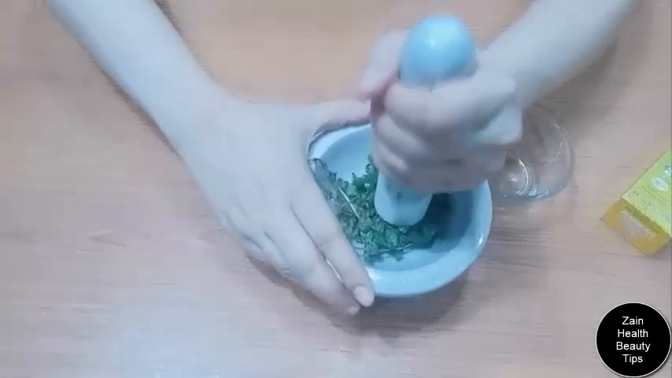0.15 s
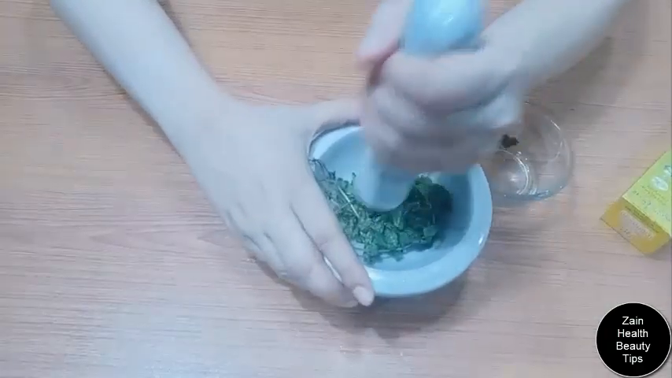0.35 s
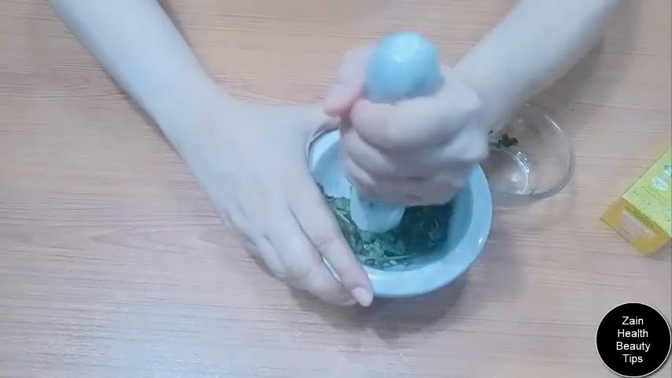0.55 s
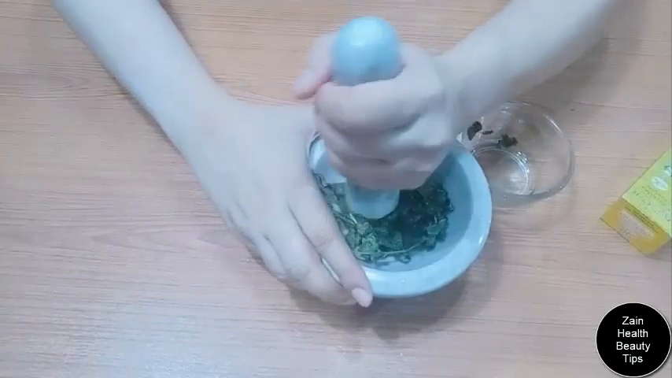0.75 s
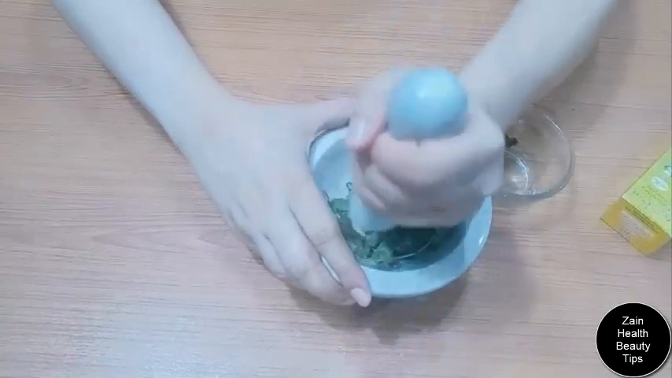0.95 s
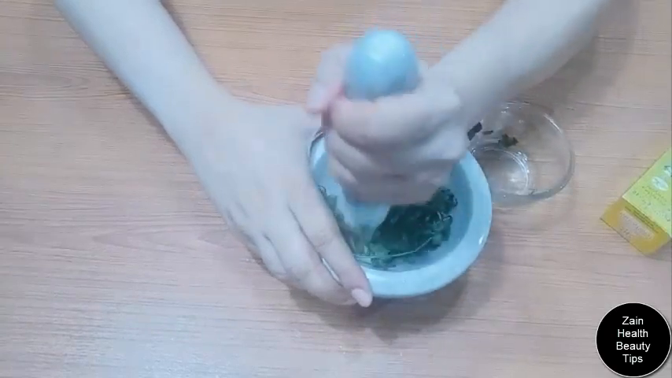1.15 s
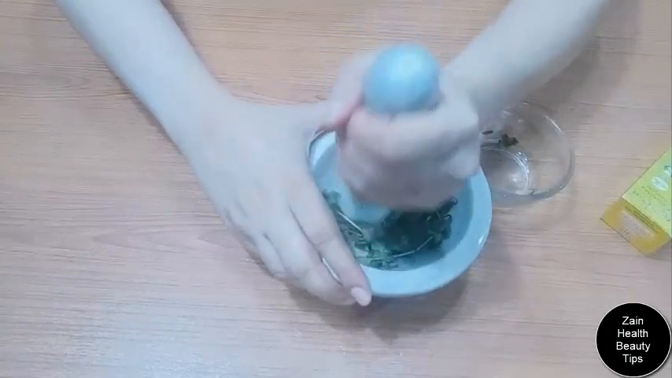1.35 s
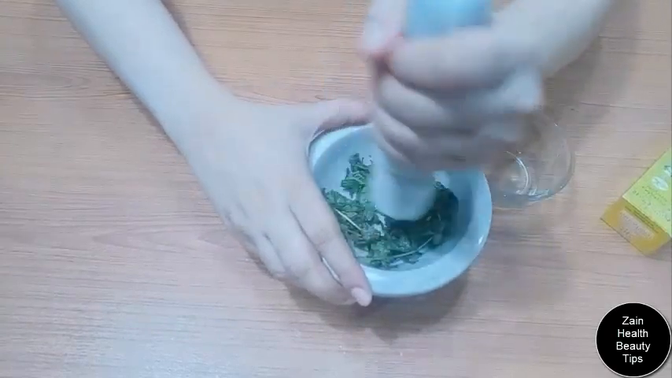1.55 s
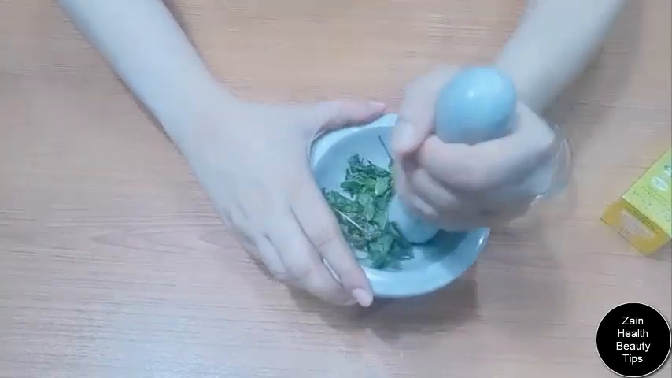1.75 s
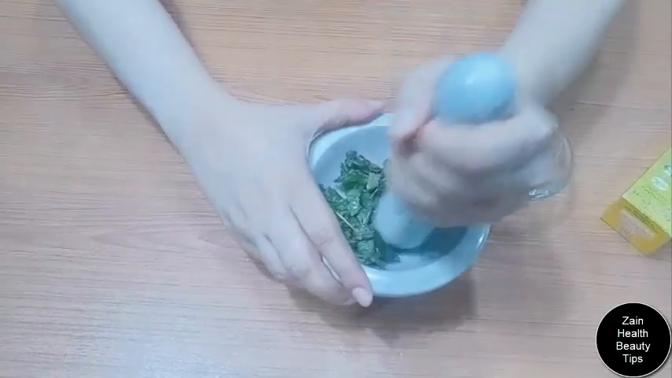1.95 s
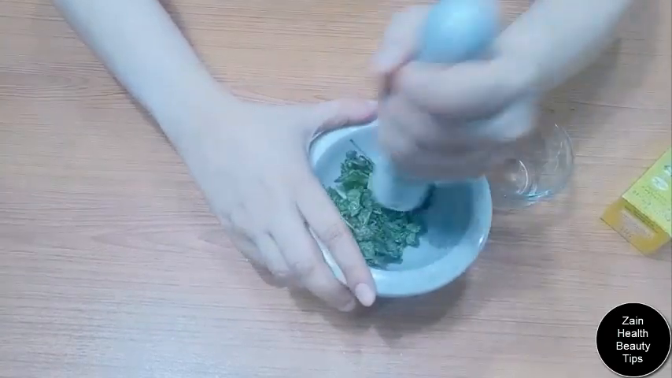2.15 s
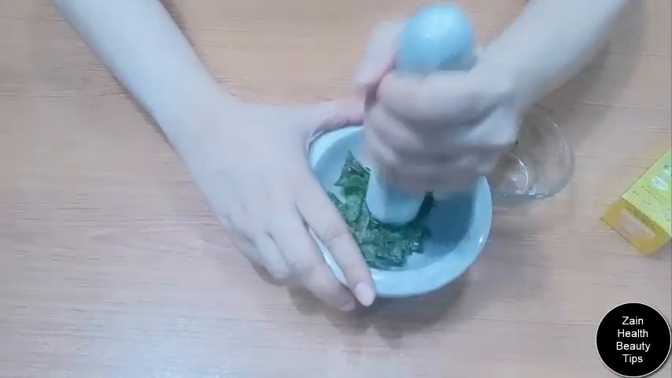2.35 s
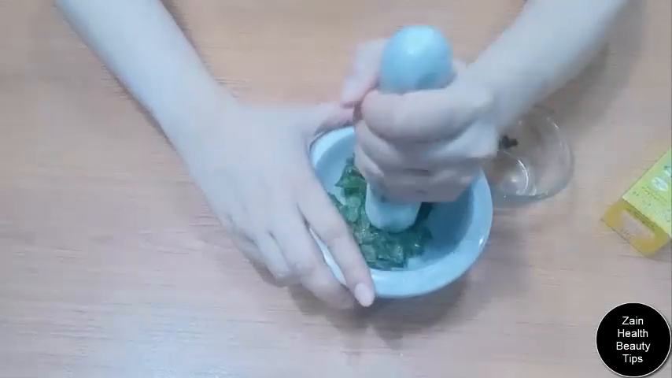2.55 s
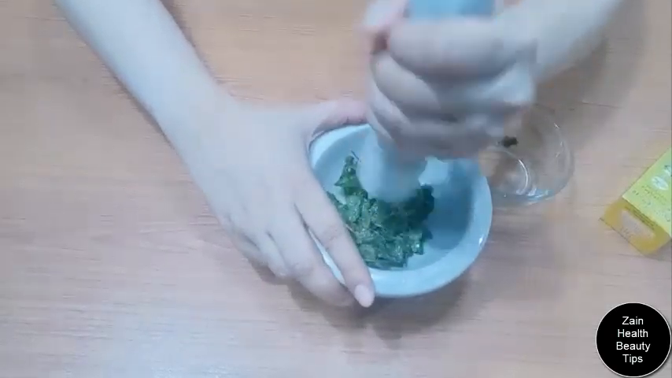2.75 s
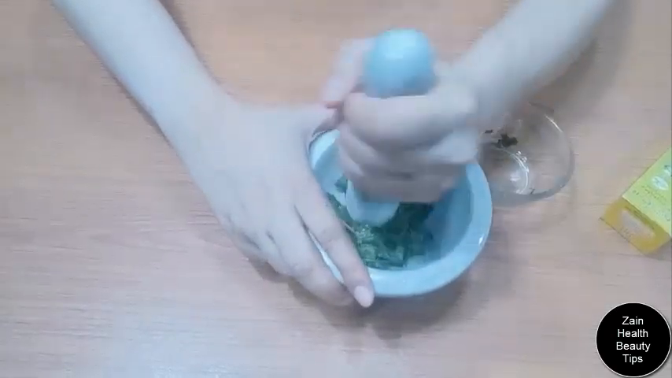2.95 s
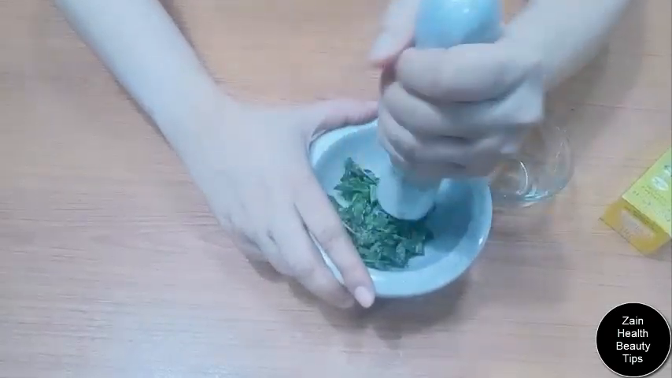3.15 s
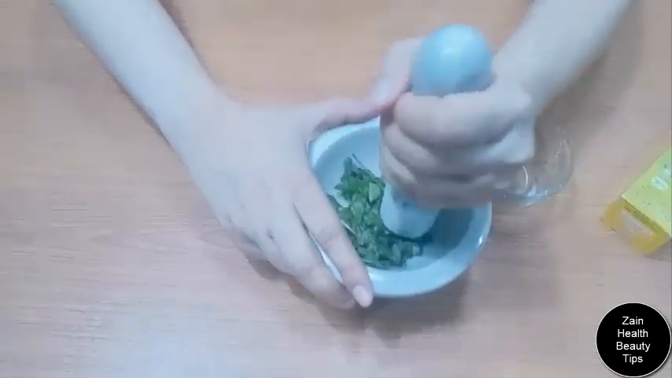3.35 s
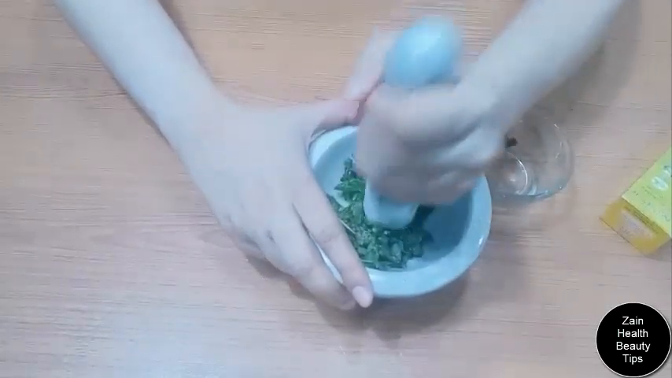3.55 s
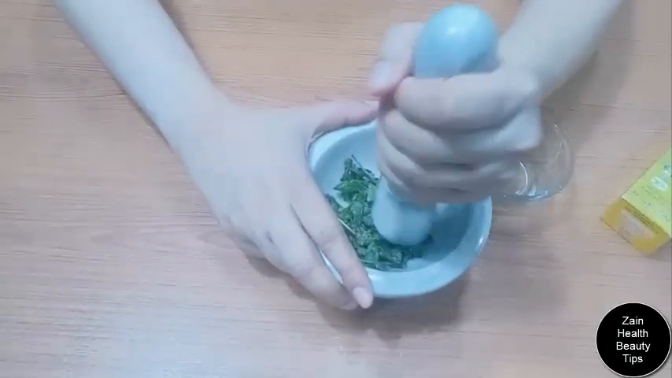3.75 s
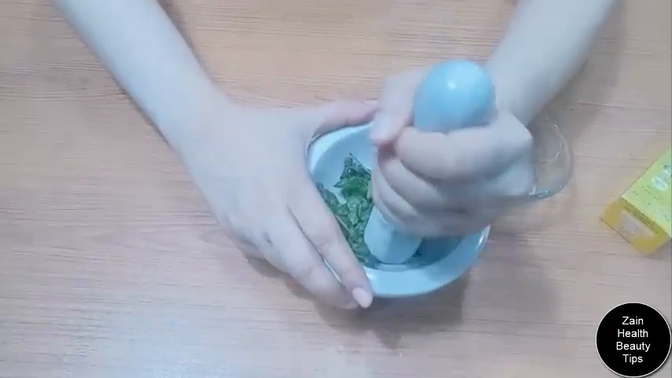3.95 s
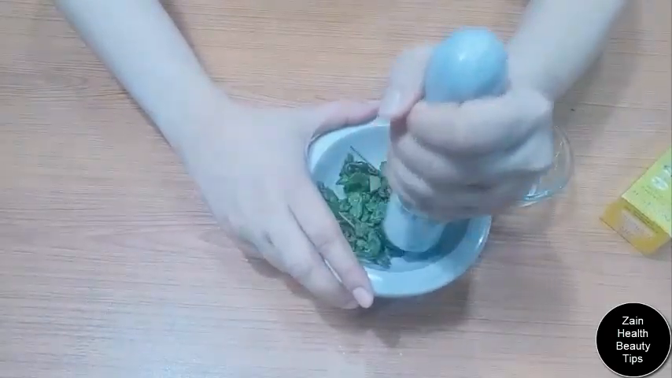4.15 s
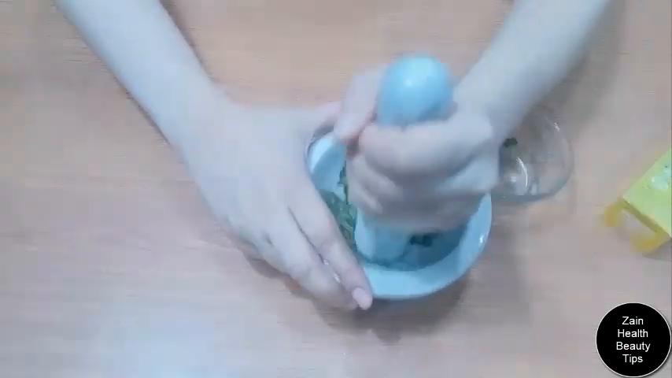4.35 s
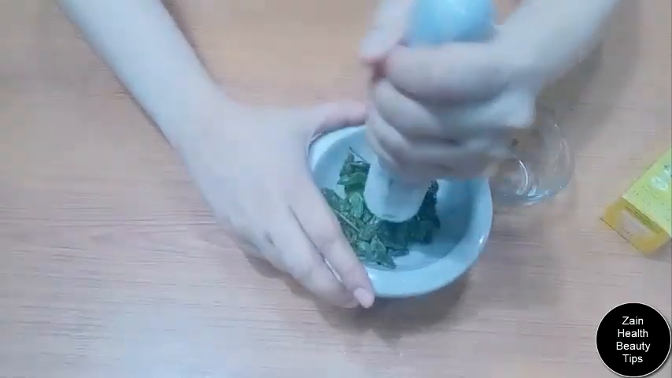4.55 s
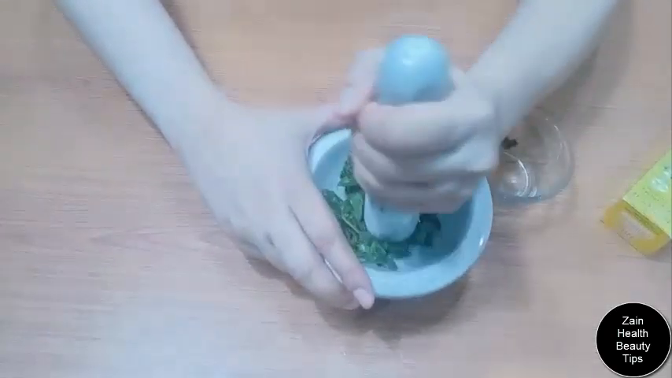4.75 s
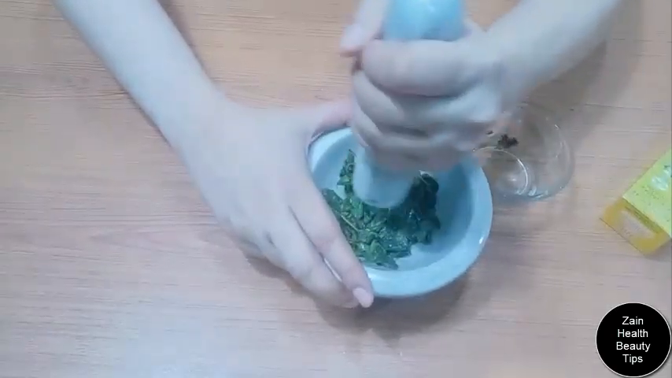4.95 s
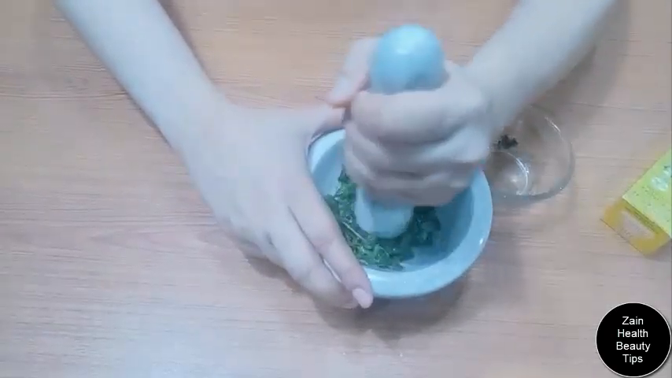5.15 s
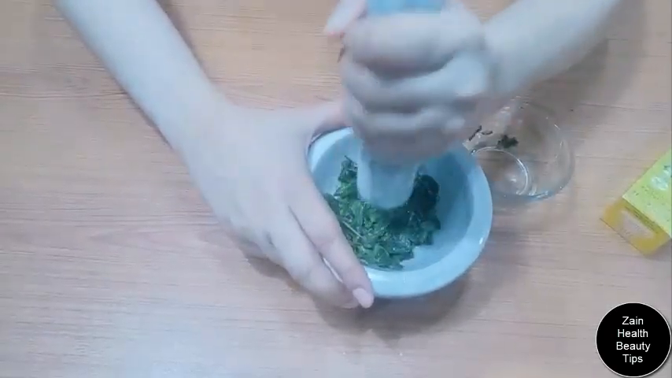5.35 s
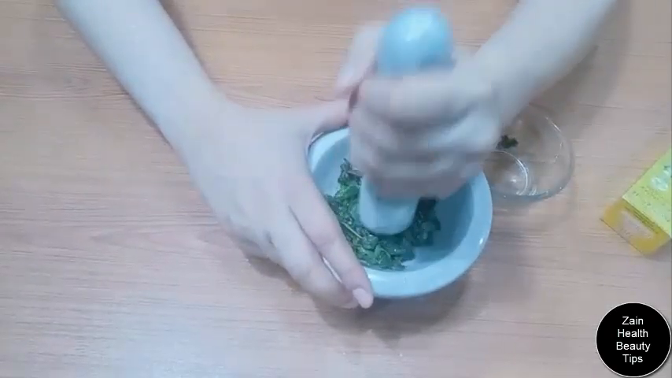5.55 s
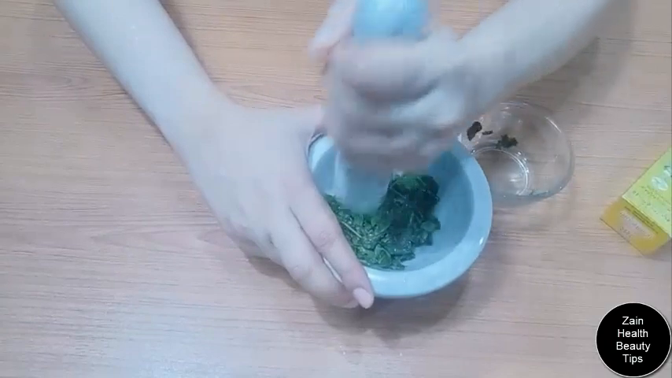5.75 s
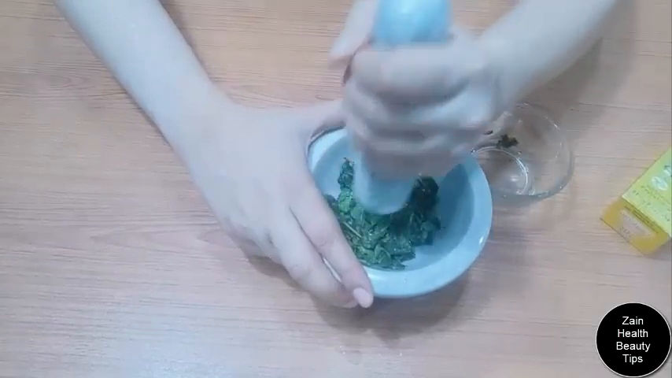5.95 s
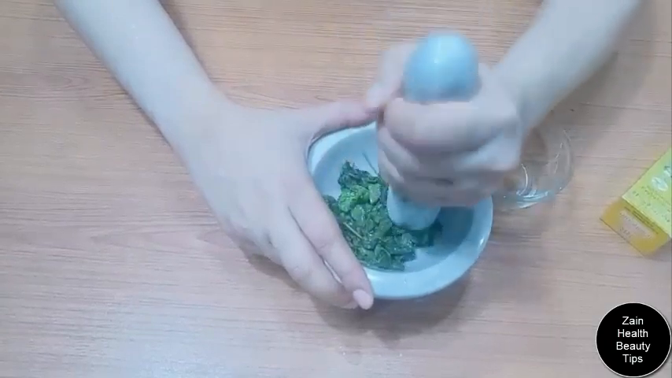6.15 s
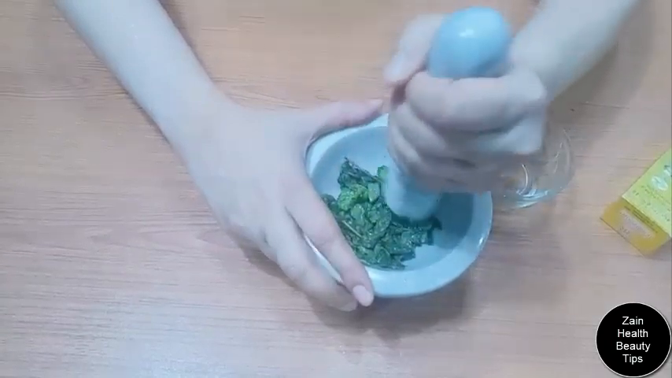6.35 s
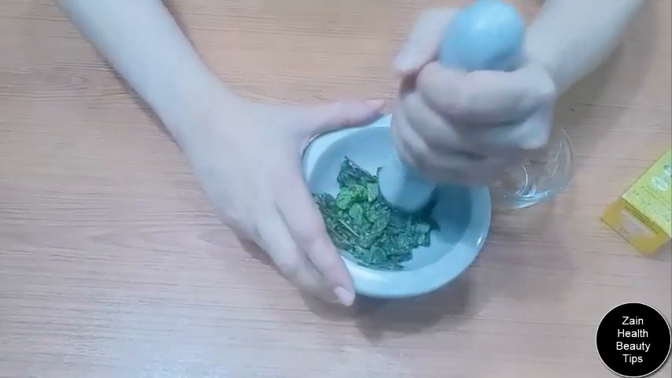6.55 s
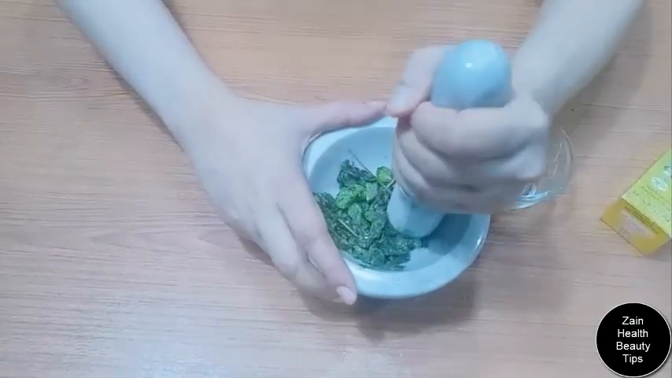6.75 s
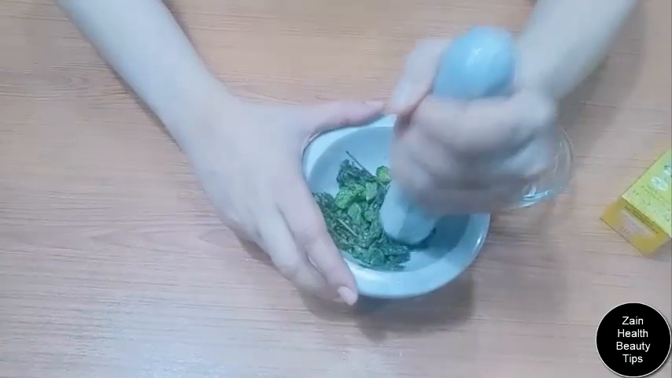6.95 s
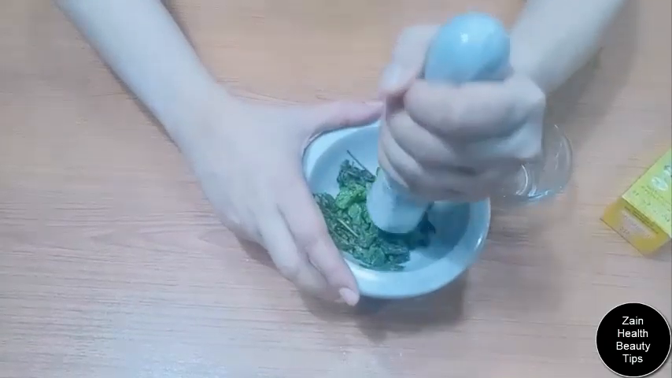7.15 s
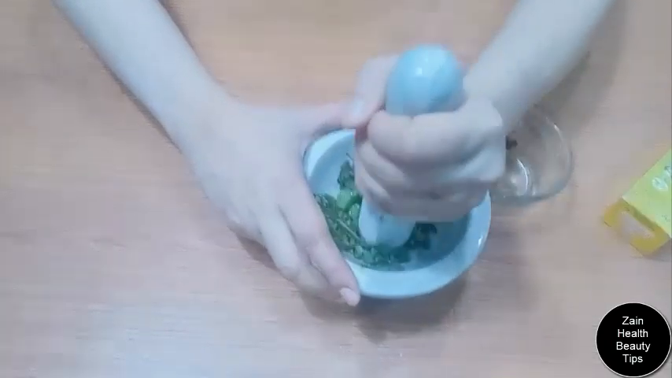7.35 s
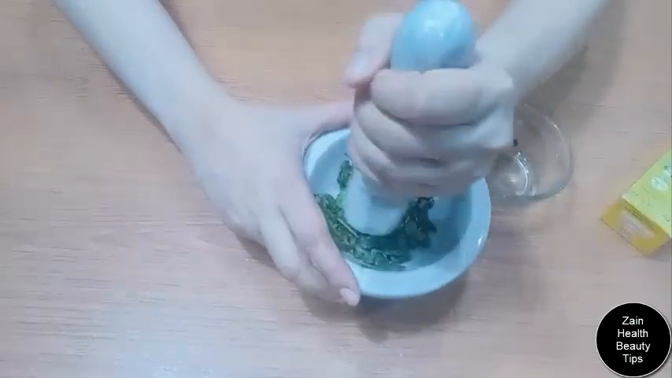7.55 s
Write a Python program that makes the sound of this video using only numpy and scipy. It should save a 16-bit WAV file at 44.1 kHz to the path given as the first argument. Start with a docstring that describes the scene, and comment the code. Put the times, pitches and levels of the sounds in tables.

```python
"""Pestle and mortar in a kitchen

A pestle pounds fresh mint in a ceramic mortar on a wooden table, close by, in a live kitchen.
Strokes crush leaves (shaped noise bursts) and thump the table (a short swing and decaying modes);
three reach the bare bowl and clack, and the mortar rocks back onto the wood. In an early pause the
pestle grinds softly (noise under slow pressure). Faint hollow tones (narrow noise) come and go behind."""
import sys
import numpy as np
from scipy import signal
from scipy.fft import rfft, irfft, next_fast_len
from scipy.io import wavfile

SR = 44100
rng = np.random.default_rng(int(sys.argv[2]) if len(sys.argv) > 2 else 0)


def to_wav(sig):
    """Store sig (one row per channel, or 1-D mono) as 16-bit WAV at the path in sys.argv[1].

    Samples outside -1..1 are clipped; the rate is SR.
    """
    pcm = np.clip(np.atleast_2d(sig), -1, 1) * 32767
    pcm = np.round(pcm).astype(np.int16)
    wavfile.write(sys.argv[1], SR, pcm.T)  # frames by channels


N = 334353
TIME = np.arange(N) / SR
RING = TIME[:SR]  # one second, for single blows

# All table levels are relative: each layer adds its own gain.
# strokes on leaves: (time [s], crunch [dB], thump [dB], time to bottom out [s],
# knock of the mortar rocking back [dB], crispness [dB], crunch pitch [Hz], rattle on the glaze [dB])
STROKES = [(0.064, -23.5, -32, 0.0021, -32, -5, 4920, -29),
           (0.39, -15, -22.5, 0.0028, -26, -2.5, 5060, -28.5),
           (2.2065, -22, -24.5, .0016, -24.5, -9, 4950, -33.5),
           (2.5119, -12.5, -19, 0.0031, -50, 1, 4950, -23),
           (2.9049, -19, -19, 0.0029, -33.5, 0, 4620, -29.5),
           (3.2414, -7, -20, 0.0041, -14.5, -2, 5260, -29.5), (3.559, -15, -18, 0.0024, -19, -7, 5000, -41),
           (4.338, -22, -20, 0.0087, -19, -6.5, 5000, -43),
           (4.678, -15.5, -21, 0.0065, -17, -3.5, 5590, -32),
           (5.016, -23, -17.5, 0.0026, -35, -9, 4830, -38),
           (5.416, -30, -21.5, 0.0033, -43.5, -6.5, 4700, -37),
           (5.7892, -31, -21.5, 0.0025, -31, -6.5, 4880, -32),
           (6.1434, -16, -26, 0.0084, -45, -10, 4750, -34),
           (6.403, -15.5, -21.5, 0.0035, -23, 3.5, 5090, -29.5),
           (6.985, -15, -21.5, 0.0031, -13, -9, 5140, -45),
           (7.063, -25, -31, 0.0029, -34.5, -15, 4260, -49),
           (7.301, -20.5, -20, 0.0075, -17, -8.5, 5630, -22)]
# strokes on the bare bowl: (time [s], clack [dB], thump [dB], bowl ring [dB], room send [dB], clack pitch [Hz],
# ring length left by the grip [0-1], rebound [dB], rebound delay [s], grit [dB])
CLACKS = [(1.662, -2, -25, -17.5, -1, 2215, 1, -4.5, 0.015, -15),
          (3.8414, 1, -24.5, -18.5, -18, 1920, 0.31, -5.5, 0.012, -20.5),
          (6.677, -2.5, -16.5, -17, -5, 2240, 0.42, 0.5, .0111, -7.5)]
# colour of wet pulp and stems: (frequency [Hz], level [dB])
SQUELCH = [(200, 18), (600, -6), (1200, 8), (2600, 2), (3600, -9.5), (5500, -3), (7500, -18.5),
           (10400, -23), (11300, -62.5)]

CRUNCH_HZ, CRUNCH_LEAD_S = 5000, .06  # main peak of the crunch table; sound ahead of the burst's middle
THUMP_HZ, USUAL_THUMP_DB = 187.4, -20


def undb(db):
    """Decibels to gain."""
    return 10 ** (np.asarray(db) / 20)


def unit(x):
    """Scale to rms 1."""
    return x / np.sqrt(np.mean(x ** 2))


def add(track, s, sound):
    """Mix a sound into a track at time s."""
    i = max(int(s * SR), 0)
    track[i:i + len(sound)] += sound[:N - i]


def through(x, response):
    """Play a sound through an impulse response."""
    return signal.fftconvolve(x, response)[:len(x)]


def colour(points, size=4096):
    """Causal (minimum-phase) impulse response of unit energy with the given spectral shape."""
    hz, db = np.transpose(points)
    bin_hz = np.arange(size // 2 + 1) * SR / size
    log_gain = np.log(undb(np.interp(np.log(bin_hz + 1), np.log(hz), db)))
    cepstrum = irfft(log_gain)
    # fold the cepstrum forward in time
    cepstrum[1:size // 2] *= 2
    cepstrum[size // 2 + 1:] = 0
    response = irfft(np.exp(rfft(cepstrum)))
    return response / np.linalg.norm(response)


def ring(modes, jitter_db, detune):
    """Decaying modes; every blow weights and tunes them a little differently."""
    chance = rng.standard_normal((len(modes), 2))
    out = 0
    for (hz, db, t60_s), (a, b) in zip(modes, chance):
        decay = undb(db + jitter_db * a - 60 * RING / t60_s)
        out = out + decay * np.sin(2 * np.pi * hz * (1 + detune * b) * RING)
    return out


def grains(count, spread_db):
    """Dense tiny clicks of very uneven size."""
    return unit(rng.standard_normal(count) * undb(spread_db * rng.standard_normal(count)))


def lumps(depth_db, hold_s=0.0055, t=RING):
    """Gain that wanders at random, as when clumps of pulp give way one by one."""
    knots_s = np.arange(SR // 100) * hold_s
    return undb(depth_db * np.interp(t, knots_s, rng.standard_normal(len(knots_s))))


def room_tone(db=-54.5, own=0.68, rumble_db=-69):
    """Quiet steady house noise, partly shared by the ears, with a deep rumble separate in each."""
    # house noise: (frequency [Hz], level [dB])
    floor = [(15, -37), (25, 3), (152, -12), (254, -8.5), (619, -26.5), (907, -26.5), (1000, -43),
             (1140, -23), (1360, -32.5), (1590, -26), (3680, -29), (7000, -38), (11000, -68), (14300, -98),
             (22000, -120)]
    deep = [(15, -6), (30, 0.0), (80, -3.5), (200, -33.5), (1000, -85.0)]
    shared, left, right = (through(rng.standard_normal(N), colour(floor)) for _ in range(3))
    rumble = np.array([through(rng.standard_normal(N), colour(deep)) for _ in range(2)])
    return undb(db) * (shared + own * np.array([left, right])) + undb(rumble_db) * rumble


def far_tones(width_hz=85, skirt_hz=280, skirt_db=-2, db=-6.0):
    """Hollow tones: narrow noise with a rough skirt, moved up to a centre pitch, swelling unevenly."""
    # tones: (middle [s], length [s], centre [Hz], level [dB])
    tones = [(1.305, 0.73, 906, -55.5), (4.935, 0.057, 1214, -38.5), (5.201, 0.055, 1186, -40),
             (5.374, 0.076, 1195, -33), (5.606, 0.078, 1000, -48), (6.139, 0.11, 1002, -38.5),
             (6.334, 0.13, 866, -39.5), (6.601, 0.28, 1015, -38.5), (7.089, 0.27, 1000, -47),
             (7.238, 0.11, 1171, -33), (7.537, 0.093, 1200, -27)]
    out, t = np.zeros(N), RING - .5
    for s, length_s, hz, tone_db in tones:
        bands = []
        for cutoff_hz in (width_hz, skirt_hz):
            lowpass = signal.butter(3, cutoff_hz, fs=SR, output="sos")
            bands.append(unit(signal.sosfilt(lowpass, rng.standard_normal((2, SR)))))
        slow = bands[0] + undb(skirt_db) * bands[1]
        phase = 2 * np.pi * hz * t
        tone = unit(slow[0] * np.cos(phase) + slow[1] * np.sin(phase))
        swell = np.exp(-(2 * t / length_s) ** 2) * lumps(depth_db=6.5, hold_s=0.035)
        add(out, s - .5, tone * swell * undb(tone_db + db))
    return out


def echo_response(first_s=0.0067, build_s=0.004, wide_hz=480):
    """Diffuse echoes after the first wall returns; the ears share the bass more than the treble."""
    # kitchen echo: (frequency [Hz], level [dB], t60 [s])
    hz, db, t60_s = np.transpose([(60, -5.5, 0.86), (138, -7, 0.5), (256, -7, 0.56), (560, 2, 0.63),
                                  (1200, -5.5, 0.55), (2580, -1, 0.49), (6030, -7, 0.46), (11000, -2, 0.42)])
    edges_hz = np.append(0, np.geomspace(60, SR / 2, num=22))
    spectra = rfft(rng.standard_normal((2, SR)))
    bins_hz = np.arange(SR // 2 + 1)
    onset = np.clip((RING - first_s) / build_s, 0, 1)
    response = 0
    for lo, hi in zip(edges_hz, edges_hz[1:]):
        centre = (lo + hi) / 2
        gain_db, decay_s = (np.interp(np.log(centre), np.log(hz), column) for column in (db, t60_s))
        band = irfft(spectra * ((bins_hz >= lo) & (bins_hz < hi))) * onset * undb(-60 * RING / decay_s)
        band /= np.linalg.norm(band, axis=1, keepdims=True)
        mid, side = band * np.sqrt(2 * (hi - lo) / SR) * undb(gain_db)
        side = side * (0.25 + .85 * centre ** 2 / (centre ** 2 + wide_hz ** 2))
        response = response + np.array([mid + side, mid - side])
    return response


def kitchen(x, count=4):
    """The hands shade the bowl differently on each stroke: echo patterns rotate through a small set."""
    lifts_s = np.sort([row[0] for row in list(STROKES) + list(CLACKS)]) - .06
    pose = np.searchsorted(lifts_s, TIME) % count
    out = 0
    for k in range(count):
        part = (x * (pose == k))[None]
        out = out + signal.oaconvolve(part, echo_response(), axes=1)[:, :N]
    return out


def nearest_wall(x, lag_s=0.021, db=-13, low_hz=900):
    """One distinct bright echo: a high-passed, delayed copy."""
    bright = signal.sosfilt(signal.butter(1, low_hz, "high", fs=SR, output="sos"), x)
    return undb(db) * np.interp(TIME - lag_s, TIME, bright)


def first_ring(db=-33.0, t60_s=0.96):
    """The table and room still hum from an earlier stroke: coloured noise dying away."""
    hum_colour = [(60, -29), (200, 5.0), (290, -19.5), (380, -9.5), (520, -15.5), (1200, -24.5),
                  (2500, -40), (8000, -56.0)]
    hum = through(rng.standard_normal(N), colour(hum_colour))
    return hum * undb(db - 60 * TIME / t60_s)


def pressure(s, attack_s=0.022, release_s=0.035):
    """One turn of the pestle: it bears down until time s, then eases off."""
    t = TIME - s
    return np.exp(-np.where(t < 0, (t / attack_s) ** 2, t / release_s))


def grinding(leaf_db=-1, stems_db=-5, rumble_db=-3, light_rub_db=-65.5, fade_s=0.046,
             catch_db=2.5, catch_s=.013, spread_db=4):
    """The pestle turns in the leaves: crackle that catches and slips, over a soft table rumble."""
    # turns: (time of greatest pressure [s], leaf crackle [dB], table rumble [dB])
    turns = [(0.372, -55, -79), (0.658, -51, -71), (0.771, -48.5, -44.5), (0.9, -55.5, -56),
             (1.017, -52.5, -73), (1.127, -45.5, -45), (1.18, -72, -44.5), (1.322, -49.5, -73)]
    fine_colour = [(500, -33), (1200, -38), (2300, 5.0), (3700, -8), (5300, 10), (6800, -2.0),
                   (8200, -14.0), (10000, -10.5), (11300, -30.5)]
    table_colour = [(60, -27.0), (140, 18.5), (210, 40.0), (350, -83), (900, -45.0), (3000, -89)]
    # light rubbing joins the turns
    start, end = turns[0][0], turns[-1][0]
    contact = np.clip(np.minimum(TIME - start, end - TIME) / fade_s + 1, 0, 1)
    rub, shake = undb(light_rub_db) * contact, 0
    for s, db, low_db in turns:
        push = pressure(s)
        rub = rub + undb(db) * push
        shake = shake + undb(low_db) * push
    fine = through(grains(N, spread_db), colour(fine_colour))
    coarse = through(grains(N, spread_db), colour(SQUELCH))
    table = through(rng.standard_normal(N), colour(table_colour))
    crackle = rub * lumps(catch_db, catch_s, TIME) * (fine + undb(stems_db) * coarse)
    return undb(leaf_db) * crackle + undb(rumble_db) * shake * table


def crunch(crush_s, crisp_db=0, peak_hz=CRUNCH_HZ, approach_db=-28, approach_s=.004):
    """Leaves burst within crush_s inside a fainter rustle; the burst peaks at CRUNCH_LEAD_S."""
    # crunch colour: (frequency [Hz], level [dB])
    points = [(300, -5.5), (1200, -13), (2400, -4.5), (3500, -11), (4300, -2.5), (5000, 9.5), (6000, 3.5),
              (6800, -4.5), (7700, -16.5), (8600, -10), (10700, -16.5), (11300, -47)]
    t = RING[:SR // 8] - CRUNCH_LEAD_S
    burst = np.exp(-(2 * t / crush_s) ** 2)
    rustle = undb(approach_db) * np.exp(-abs(t) / approach_s)
    # crispness lifts the treble; the main peak moves to the clump's own pitch
    spectrum = []
    for hz, db in points:
        shift = peak_hz / CRUNCH_HZ if 4000 < hz < 7000 else 1
        spectrum.append((hz * shift, db + crisp_db * (hz > 4000)))
    sound = through(grains(len(t), spread_db=2) * (burst + rustle), colour(sorted(spectrum)))
    return sound / np.sqrt(np.sum(sound ** 2) / np.sum(burst ** 2))


def snapping(db=-8, snap_s=0.0048):
    """Single stems give way as the pestle shifts: small dull crunches."""
    # snaps: (time [s], level [dB])
    snaps = [(1.064, -34.5), (3.897, -17), (4.152, -47), (7.044, -26), (7.072, -26.5)]
    out = np.zeros(N)
    for s, snap_db in snaps:
        add(out, s - CRUNCH_LEAD_S, undb(snap_db + db) * crunch(snap_s, crisp_db=-10.0))
    return out


def thump(hz=195, push_s=0.0018, tilt_db_per_octave=0, swing_db=5, lag_s=.0125, modes_db=-3.5,
          rattle_db=-21.0, rattle_t60_s=0.12):
    """A push swings the table top once, then it shudders in its modes; tilt favours the upper ones."""
    # table with the mortar on it: (frequency [Hz], level [dB], t60 [s])
    table = [(96.7, -28.5, 1), (142.5, -20, 0.59), (151.1, -19, 0.3), (181.5, -14.5, 0.6),
             (203.5, -11, 0.37), (247.2, -11, 0.22), (307.6, -19, 0.25), (359.7, -23, 0.14),
             (538, -27, 0.092)]
    chatter_colour = [(150, -24.5), (330, 5.0), (650, 2.5), (1100, -3.5), (2000, -22), (5000, -56.5)]
    t = RING / push_s
    swing = undb(swing_db) * t ** 2 * np.exp(-t) * np.sin(2 * np.pi * hz * (RING - push_s / 2))
    modes = [(mode_hz, db + tilt_db_per_octave * np.log2(mode_hz / THUMP_HZ), t60_s)
             for mode_hz, db, t60_s in table]
    shudder = ring(modes, jitter_db=3, detune=0.007) * lumps(depth_db=2.5, hold_s=.012)
    # the foot chatters on the wood as the table swings back
    knocks = grains(SR, spread_db=7) * lumps(depth_db=3)
    chatter = through(knocks, colour(chatter_colour))
    after = undb(modes_db) * shudder + undb(rattle_db - 60 * RING / rattle_t60_s) * chatter
    return swing + np.interp(RING - lag_s, RING, after, left=0)


def clack(hz, spray_db, length_s=0.000531, spray_t60_s=0.055):
    """A hard contact: the wall swings for a few cycles; decaying noise stands for many stiff modes."""
    # spray colour: (frequency [Hz], level [dB])
    spray_colour = [(150, -26.5), (500, 1), (900, -0.5), (1450, -0.5), (2700, 2), (3500, -16), (4400, -15),
                    (5800, -11), (7500, -44.5), (10000, -36.5), (12000, -47.5)]
    t = RING - 2 * length_s
    swing = np.exp(-(t / length_s) ** 2) * np.sin(2 * np.pi * hz * t) * np.minimum(RING / length_s, 1)
    spray = rng.standard_normal(SR) * lumps(depth_db=3, hold_s=.004)
    return swing + through(undb(spray_db - 60 * RING / spray_t60_s) * spray, colour(spray_colour))


def landing(hz, thump_db, cycles=0.92):
    """The mortar's foot meets the wood: a short knock, longer when it is lower, and a thump."""
    return clack(hz, length_s=cycles / hz, spray_db=-16.5) + undb(thump_db) * thump()


def rocking(soft_db=-2, soft_hz=830, soft_thump_db=-16, soft_delay_s=0.012,
            hard_db=-1, hard_hz=1850, hard_thump_db=-14, second_delay_s=0.0051, second_db=-10):
    """The tipped mortar lands: once, dully, after a stroke on leaves; twice, sharply, after a clack."""
    out = np.zeros(N)
    for s, _, _, _, db, *_ in STROKES:
        add(out, s + soft_delay_s, undb(db + soft_db) * landing(soft_hz, soft_thump_db))
    for s, *_, db, delay_s, _ in CLACKS:
        add(out, s + delay_s, undb(db + hard_db) * landing(hard_hz, hard_thump_db))
        second = undb(db + hard_db + second_db) * landing(hard_hz, soft_thump_db)
        add(out, s + delay_s + second_delay_s, second)
    return out


def clacking(clack_db=1, ring_db=-2, thump_db=6, contact_s=0.00059):
    """Ceramic on ceramic: a clack, a thin ring damped by the grip, a thump; returns near sound, room feed."""
    # ceramic bowl, ringing freely: (frequency [Hz], level [dB], t60 [s])
    bowl_modes = [(1530, -15, .052), (1980, -17, 0.042), (2580, -19, .055), (5880, 0.5, 0.054),
                  (6180, 2, 0.12), (6370, -6, 0.051), (9650, -15, 0.032), (10250, -16.5, 0.075)]
    near, far = np.zeros((2, N))
    for s, db, low_db, bowl_db, send_db, hz, free, _, _, grit_db in CLACKS:
        held = [(mode_hz, mode_db, t60_s * free) for mode_hz, mode_db, t60_s in bowl_modes]
        onset = 1 - np.exp(-(RING / contact_s) ** 2)
        bowl = ring(held, jitter_db=1.9, detune=0.0008) * onset
        table = thump(hz=297.0, push_s=0.00096, tilt_db_per_octave=4.5)
        body = undb(bowl_db + ring_db) * bowl + undb(low_db + thump_db) * table
        crack = undb(db + clack_db) * clack(hz, spray_db=grit_db)
        add(near, s, body + crack)
        add(far, s, body + undb(send_db) * crack)
    return near, far


def rattle(t60_s=0.17, rise_s=0.0038):
    """The pestle skids over grit and stalks on the glaze: a quick spatter of bright ticks."""
    # glaze colour: (frequency [Hz], level [dB])
    glaze_colour = [(500, -11), (1300, -4), (2400, -0.5), (3100, -4), (3800, -24), (4900, 3), (6500, -2.5),
                    (7500, -22), (10400, -24), (11500, -50)]
    ticks = grains(SR, spread_db=9) * lumps(depth_db=3)
    return through(ticks * np.minimum(RING / rise_s, 1) * undb(-60 * RING / t60_s), colour(glaze_colour))


def squelch(t60_s=0.25):
    """Wet pulp gives way in uneven clumps: coloured grains dying away."""
    pulp = through(grains(SR, spread_db=9) * lumps(depth_db=4.5), colour(SQUELCH))
    return pulp * undb(-60 * RING / t60_s)


def pounding(crunch_db=-3, crush_s=0.0046, burst_s=0.00066, touch_db=-48, touch_s=0.019,
             spill_db=-10, spill_s=0.0035, rattle_db=-7, rattle_s=0.0062,
             thump_db=11, thump_hz_per_db=3, squelch_db=-32, squelch_s=0.0071, squelch_per_db=1):
    """Strokes cushioned by leaves: crunch, rattle, thump and squelch; returns near sound, room feed."""
    burst, spill, body = np.zeros((3, N))
    for s, db, low_db, bottom_s, _, crisp_db, hz, glaze_db in STROKES:
        start_s = s - CRUNCH_LEAD_S
        add(burst, start_s + burst_s, undb(db + crunch_db) * crunch(crush_s, crisp_db, hz))
        # the pestle brushes the top leaves
        add(burst, start_s, undb(touch_db) * crunch(touch_s))
        # what reaches the walls has first scattered between bowl and hands
        add(spill, start_s + burst_s, undb(db + spill_db) * crunch(spill_s, crisp_db, hz))
        add(body, s + rattle_s, undb(glaze_db + rattle_db) * rattle())
        # a heavier stroke packs the leaves tighter, knocks higher and squeezes more juice
        extra_db = low_db - USUAL_THUMP_DB
        knock = thump(hz=THUMP_HZ + thump_hz_per_db * extra_db)
        add(body, s + bottom_s, undb(low_db + thump_db) * knock)
        wet_db = squelch_db + squelch_per_db * extra_db
        add(body, s + bottom_s + squelch_s, undb(wet_db) * squelch())
    return burst + body, spill + body


def ports(x, split_hz=1700, side=1.0, lean=.12):
    """Two close microphone ports: the bass is shared, the treble is out of step and leans left."""
    bass = signal.sosfiltfilt(signal.butter(1, split_hz, fs=SR, output="sos"), x)
    treble = x - bass
    quarter_turn = np.imag(signal.hilbert(treble, next_fast_len(N)))[:N]
    difference = side * quarter_turn + lean * treble
    return np.array([x + difference, x - difference])


def scene():
    """The mortar close by, its echo in the kitchen, and the background."""
    small = rocking() + snapping() + grinding() + first_ring()
    soft, soft_echo = pounding()
    hard, hard_echo = clacking()
    feed = undb(-4) * small + soft_echo + hard_echo
    near = ports(small + soft + hard)
    return near + nearest_wall(feed) + kitchen(feed + far_tones()) + room_tone()


def record(dry, low_hz=78, top_hz=11500):
    """The microphone thins the deep bass and clips at full scale; then the top is cut steeply."""
    thin = signal.sosfilt(signal.butter(2, low_hz, "high", fs=SR, output="sos"), dry)
    top_cut = signal.ellip(8, .2, 70, top_hz, fs=SR, output="sos")
    return signal.sosfilt(top_cut, np.clip(thin, -1, 1))


dry = scene()
out = record(dry)
to_wav(out)
```